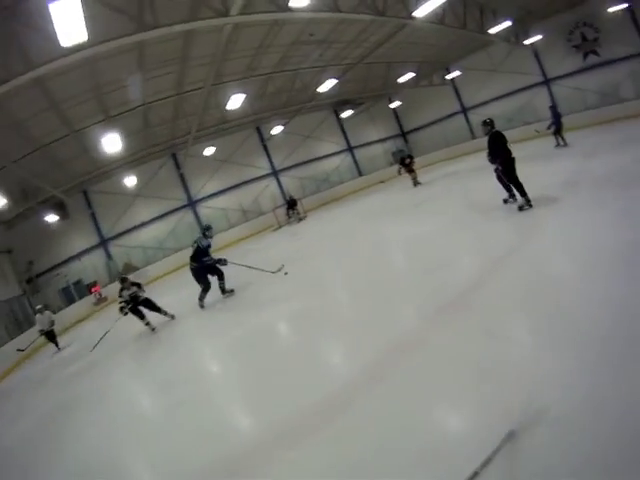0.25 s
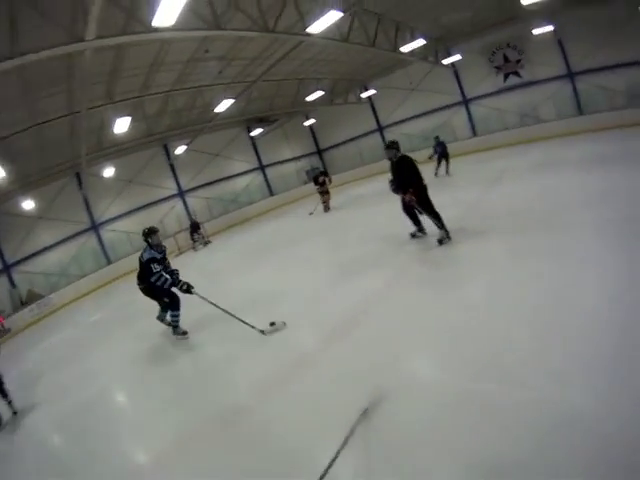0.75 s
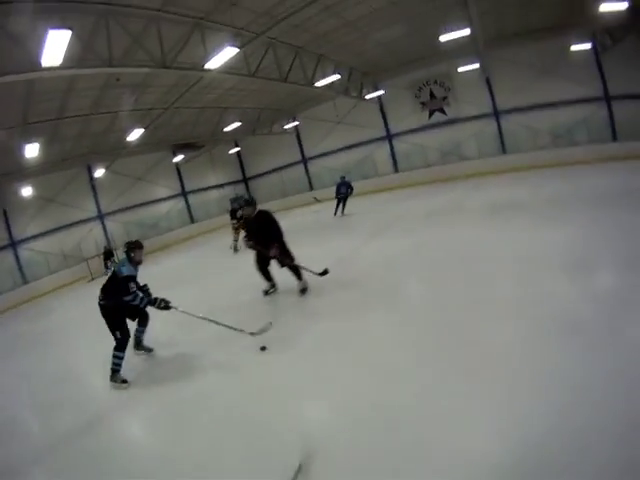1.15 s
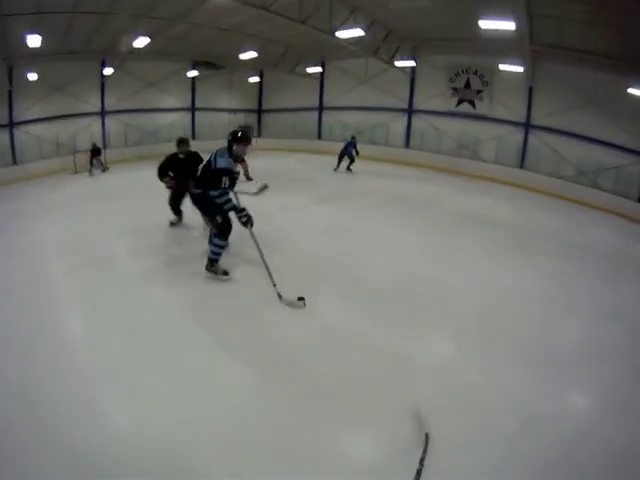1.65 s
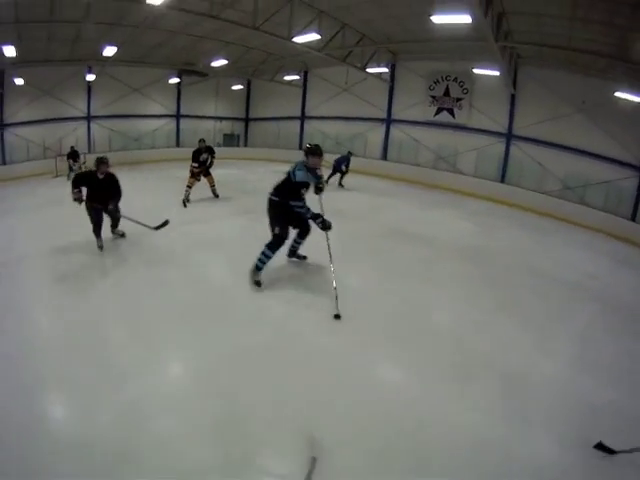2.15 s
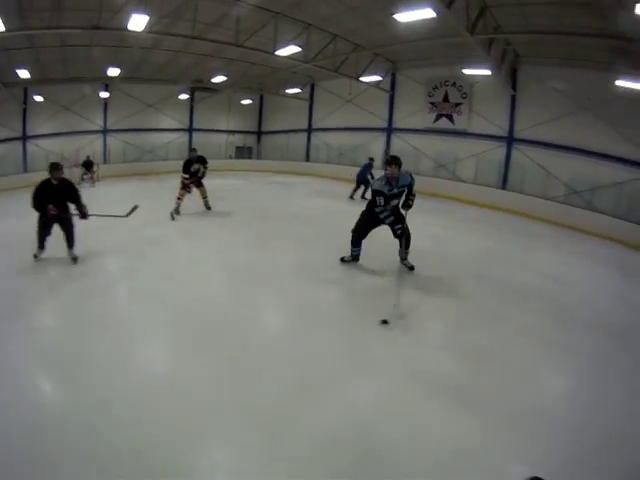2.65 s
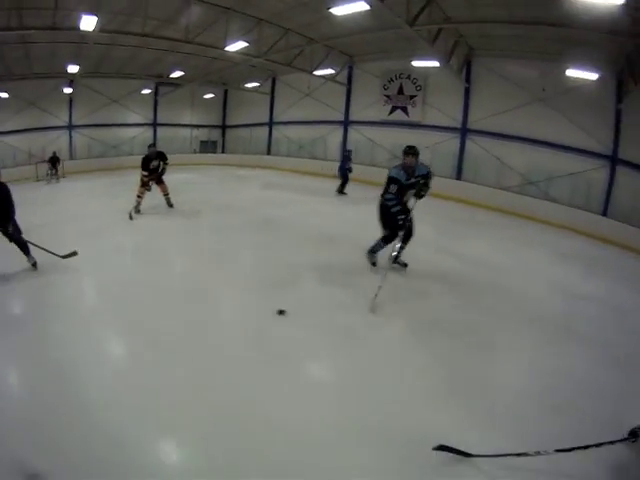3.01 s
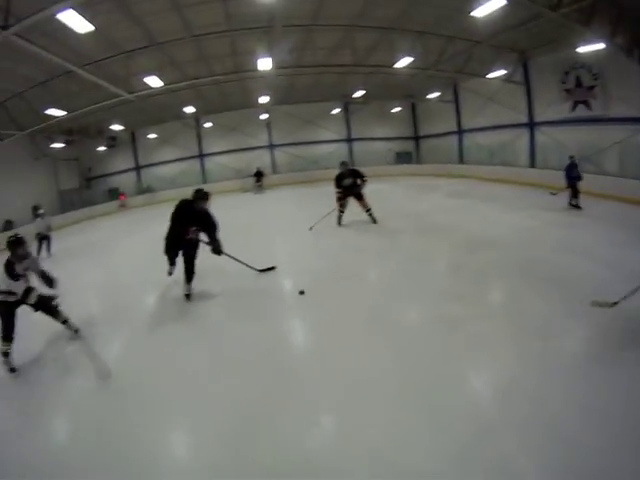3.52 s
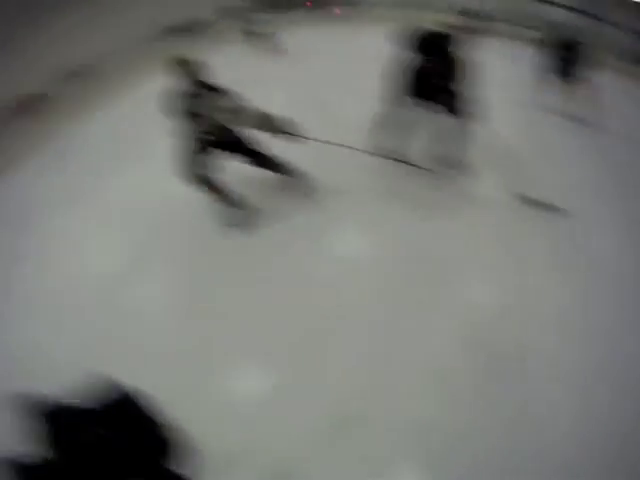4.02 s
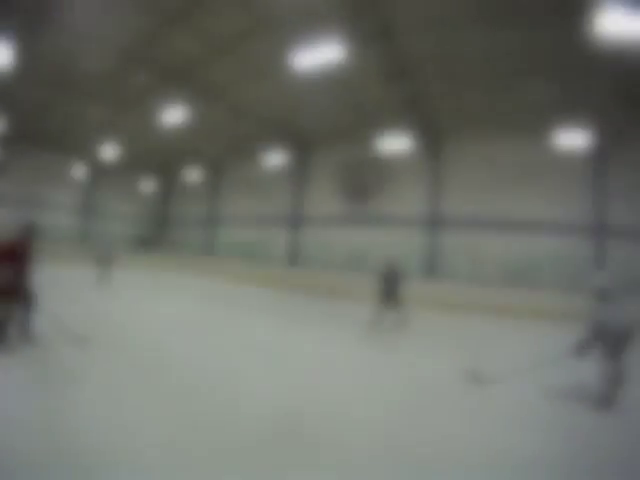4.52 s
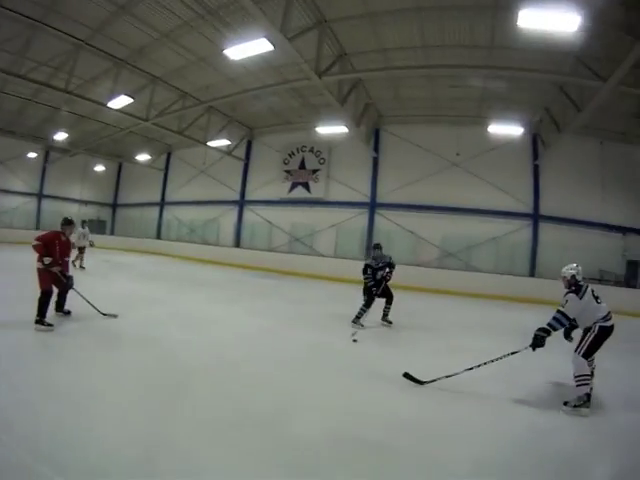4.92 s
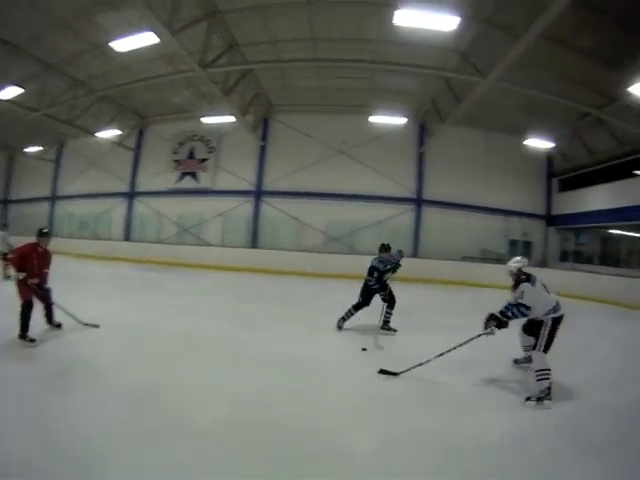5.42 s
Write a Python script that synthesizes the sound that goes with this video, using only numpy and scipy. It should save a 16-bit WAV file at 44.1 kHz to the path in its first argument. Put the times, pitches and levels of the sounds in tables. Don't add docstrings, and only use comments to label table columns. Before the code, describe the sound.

Skate blades scrape and hiss across rink ice over muffled rumble, with light stick ticks building to a hard puck clack and a grinding stop.

```python
import sys
import numpy as np
from scipy import signal
from scipy.io import wavfile
from scipy.ndimage import uniform_filter1d

SR = 44100
rng = np.random.default_rng(int(sys.argv[2]) if len(sys.argv) > 2 else 0)


def boost(x):
    u = np.asarray(x, float) / 20
    return 10 ** u


def master_out(mix):
    frames = np.transpose(np.atleast_2d(mix))
    ceiling = np.clip(frames, -1, 1)
    pcm = np.round(ceiling * 32767).astype(np.int16)
    wavfile.write(sys.argv[1], SR, pcm)


N = 249606
HALL_T60_S = 1.6

# frequency in Hz, width in Hz, level in dB.
CASE_MODES = [(406, 190, -23.5), (817, 330, -12), (1100, 245, -5), (1290, 129, -2.5), (1538, 115, -7),
              (1943, 180, -2), (2440, 324, -6), (3193, 192, -6.5), (3650, 283, -4.5), (4340, 307, -9.5),
              (4716, 516, -11), (5064, 425, -11.5), (5506, 280, -15)]
# time in seconds, level in dB.
AIR_SPEED = [(0, -38), (1.0, -36), (1.6, -41), (2.2, -40.5), (2.65, -38.5), (3.1, -43), (4.3, -46),
             (4.9, -47.5), (5.3, -48), (5.66, -44)]
# centre in seconds, peak in dB, length in seconds, flutter in relative dB.
HEAD_LURCHES = [(0.0, -24, 0.13, -21), (0.336, -20.5, 0.16, -17.5), (0.57, -33, 0.074, -17),
                (.74, -24.5, .14, -14), (1.076, -21.5, 0.15, -11.5), (1.199, -28.5, 0.2, -15),
                (1.464, -28, 0.18, -32), (1.589, -31.5, .07, -8), (1.72, -26, 0.058, -11),
                (1.854, -34, 0.085, -15), (2.07, -37, .08, -8), (2.375, -35, 0.062, -12),
                (2.623, -32, 0.19, -23), (3.36, -37, .1, -21), (3.742, -37, 0.12, -13),
                (3.878, -33, 0.14, -1.5), (3.994, -29, 0.15, -6.5), (4.19, -33.5, .12, 0.5),
                (4.84, -46, 0.066, 0), (4.944, -41, .07, 2), (5.057, -43.5, 0.037, -1),
                (5.33, -46, .07, -12), (5.453, -39, .08, -10), (5.584, -34.5, .14, -26)]
# start in seconds, peak in dB, pitch in Hz.
HELMET_KNOCKS = [
    (.266, -23, 123),
    (0.362, -18, 115),
    (1.076, -27, 129),
    (1.585, -22.5, 99),
    (1.715, -21, 73.5),
    (3.086, -25.5, 82),
    (3.688, -31, 302),
    (3.734, -27, 324),
    (4.1592, -14, 204),
]
# start in seconds, hold in seconds, level in dB.
FAR_CARVES = [
    (2.35, .15, -48.5),
    (2.82, 0.092, -50),
    (3.137, 0.45, -46),
    (4.2, 0.18, -66),
    (4.608, 0.16, -43),
]
# time in seconds, blade loudness in dB, nearness of the closest skater in dB.
PLAY_CURVE = [(0.0, -39.5, -1.5), (0.3, -38, -1), (0.7, -39, 0.5), (1.1, -37.5, 2), (1.45, -36.5, -0.5),
              (1.9, -38, -0.5), (2.3, -38.5, 0.5), (2.56, -34.5, 3.5), (2.76, -36.5, 4.5), (2.9, -34, 1.5),
              (3.15, -36, 5), (3.45, -33, 3), (3.64, -35, 0), (4.5, -41.5, 4), (4.8, -35, 3),
              (5.4, -38.5, 0), (5.47, -33.5, 1.5), (5.66, -33, 0.5)]
# time in seconds, peak in dB, knock in relative dB, crack in relative dB.
FAR_TICKS = [(0.0755, -28, -5, -4), (0.152, -27, -14, -9), (0.184, -30, -12, -8), (.379, -33, -7, -6),
             (0.61, -30, -3, -11), (0.917, -30, 2, -10), (0.997, -29, -4, -13), (1.071, -29, -3, -7),
             (1.3395, -23, -9, -11), (1.4085, -23, -5, -12), (1.7055, -21, -7, -16), (1.79, -29, -8, -15),
             (2.049, -30, -4, -15), (2.459, -28, -4, -11), (2.611, -22, -8, -13), (2.657, -26, -5, -11),
             (2.791, -26, -9, -7), (2.8525, -24, -5, -9), (2.868, -23, -11, -14), (3.009, -24, -13, -13),
             (3.186, -28, -7, -8), (3.291, -25, -9, -14), (4.114, -19, -5, -8), (4.145, -22, -5, -11),
             (5.518, -18, -9, -8), (5.55, -23, -12, -17), (5.564, -20, -13, -14), (5.573, -28, 4, -6)]
# time in seconds, peak in dB, knock and crack in relative dB, length in seconds.
PUCK_FIGHT = [(3.576, -30.5, 2.5, -17, 0.011), (3.592, -21.5, -19, -21, 0.0024),
              (3.6485, -16, -8.5, -13, 0.0067), (3.701, -19, -12, -18, 0.01),
              (3.712, -24.5, -20, -17, 0.018), (3.734, -7.5, -3, -3.5, 0.0044),
              (3.74, -19.5, -3, -7.5, 0.028), (3.774, -15, -19, -20, 0.011), (3.787, -18, -10, -10, 0.0093),
              (3.813, -28, -3, 0, 0.0033), (3.8268, -12, -13, 5, 0.003), (3.83, -10, -9.5, -8.5, 0.016),
              (3.868, -16.5, -11.5, -3, 0.026), (3.908, -11, -17, -11, 0.0024),
              (3.919, -25, -7, -0.5, 0.007)]
# frequency in Hz, level in dB, T60 in seconds.
SHOT_MODES = [(1070, -8, .022), (1570, -1, .026), (1960, -4, .016), (2370, -4, .014), (2550, -1, .016)]


def rms_one(x):
    return x / np.sqrt(np.mean(x ** 2) + 1e-20)


def in_time(rows):
    time_s, *columns = np.transpose(rows)
    return [np.interp(np.arange(N) / SR, time_s, column) for column in columns]


def band(x, low_hz, high_hz, order=2):
    return signal.sosfilt(signal.butter(order, [low_hz, high_hz], "band", fs=SR, output="sos"), x)


def drift(rate_hz):
    r = np.exp(-2 * np.pi * rate_hz / SR)
    return rms_one(signal.lfilter([1], [1, -2 * r, r * r], rng.standard_normal(N + SR))[SR:])


def swell(start_s, rise_s, hold_s, db_per_s):
    t = np.arange(N) / SR - start_s
    return np.clip(t / rise_s, 0, 1) * boost(-db_per_s * np.maximum(t - rise_s - hold_s, 0))


def steadied(x):
    return rms_one(x / (uniform_filter1d(np.abs(rms_one(x)), size=2500) + 0.93))


def case(x):
    out = 0
    for k, (hz, width_hz, db) in enumerate(CASE_MODES):
        r = np.exp(-np.pi * width_hz / SR)
        b = (1 - r * r) / 2 * np.array([1, 0, -1])
        a = [1, -2 * r * np.cos(2 * np.pi * hz / SR), r * r]
        out = out + (-1) ** k * boost(db) * signal.lfilter(b, a, x)
    return out


def registers(x):
    heard = case(x)
    return band(heard, 257, 1257), band(heard, 1750, 2807, order=3), band(heard, 2644, 7670, order=3)


def hall(x):
    t = np.arange(round(1.5 * SR)) / SR
    onset = np.clip((t - 0.02) / 0.047, 0, 1)
    tail = rng.standard_normal(len(t)) * boost(-60 * t / HALL_T60_S) * onset
    tail = band(tail, 1690, 2530)
    return signal.fftconvolve(x, tail / np.sqrt(np.sum(tail ** 2)))[:N]


def lingering(gain):
    r = boost(-120 / (HALL_T60_S * SR))
    power = signal.lfilter([1 - r], [1, -r], gain ** 2, zi=[r * gain[0] ** 2])[0]
    return np.sqrt(power)


def hiss():
    return boost(-59.5) * rms_one(band(rng.standard_normal(N), 173, 350, order=1))


def buffeting():
    air_db, = in_time(AIR_SPEED)
    rumble_power = boost(air_db) ** 2
    flutter_power = boost(-47.5 + 0.55 * (air_db + 39.5)) ** 2
    for centre_s, peak_db, length_s, flutter_db in HEAD_LURCHES:
        phase = np.clip((np.arange(N) / SR - centre_s) / length_s, -0.5, 0.5)
        lump = boost(peak_db) ** 2 * np.cos(np.pi * phase) ** 4
        rumble_power = rumble_power + lump
        flutter_power = flutter_power + boost(flutter_db) ** 2 * lump
    turn = boost(-42) * swell(start_s=3.64, rise_s=0.21, hold_s=0.5, db_per_s=36)
    flutter_power = flutter_power + turn ** 2

    rush = boost(-16.5) * rms_one(band(rng.standard_normal(N), 177, 686))
    rumble = rms_one(band(rng.standard_normal(N), 24.1, 46.3))
    flutter = band(rng.standard_normal(N), 25.3, 90.5, order=1)
    flutter = rms_one(band(flutter, 44.3, 163, order=3))
    rumble_gain = boost(1.36 * drift(3.8)) * np.sqrt(rumble_power)
    flutter_gain = boost(0.57 * drift(17)) * np.sqrt(flutter_power)
    return rumble_gain * steadied(rumble) + flutter_gain * (steadied(flutter) + rush)


def jolts():
    out = np.zeros(N)
    t = np.arange(round(0.06 * SR)) / SR
    for start_s, peak_db, hz in HELMET_KNOCKS:
        i = round(start_s * SR)
        swing = np.sin(2 * np.pi * hz * t) * boost(-9 * hz * t)
        out[i:i + len(t)] += boost(peak_db) * swing * np.minimum(t / 0.0041, 1)
    return out


def far_turns():
    gain = sum(boost(db) * swell(start_s, 0.027, hold_s, 48) for start_s, hold_s, db in FAR_CARVES)
    return lingering(gain) * rms_one(band(case(rng.standard_normal(N)), 710, 1170))


def chips(per_s, spread_db):
    sizes = boost(spread_db * np.minimum(rng.exponential(1, N), 5)) * rng.choice([-1, 1], N)
    breaks = rng.random(N) < per_s * boost(4.5 * drift(30)) / SR
    return rms_one(sizes * breaks)


def skates():
    play_db, near_db = in_time(PLAY_CURVE)
    play_swing_db = play_db + 38
    stop_s = 3.748
    grind = swell(stop_s, rise_s=0.17, hold_s=0.26, db_per_s=31.5)
    snow = boost(-34) * swell(stop_s, rise_s=0.075, hold_s=0.2, db_per_s=32)

    drone_gain = np.hypot(boost(-46 + 0.8 * play_swing_db + 0.26 * near_db), boost(-39) * grind)
    scrape_gain = np.hypot(boost(play_db), boost(-25.5) * grind)
    spray_gain = np.hypot(boost(-51 + 1.2 * play_swing_db + near_db), snow)

    wash = rng.standard_normal(N) * boost(1.2 * drift(33))
    drone, scrape, spray = registers(wash + boost(-8.5) * chips(per_s=1500, spread_db=3.5))
    drone = lingering(drone_gain) * boost(1.0 * drift(3)) * rms_one(drone)
    scrape = scrape_gain * boost(0.5 * drift(7.1)) * rms_one(scrape)
    spray = spray_gain * boost(0.75 * drift(6.6)) * rms_one(spray)
    return drone + scrape + spray


def clacks():
    out = np.zeros(N)
    t = np.arange(round(0.06 * SR)) / SR
    tick_length_s = 0.007
    contacts = PUCK_FIGHT + [(*tick, tick_length_s) for tick in FAR_TICKS]
    for time_s, peak_db, knock_db, crack_db, length_s in contacts:
        rattle = rng.standard_normal(len(t))
        chatter = np.sign(rattle) * np.abs(rattle) ** 0.5 * np.exp(-(1.31 * t / length_s) ** 3)
        knock, body, crack = [part / np.abs(part).max() for part in registers(chatter)]
        hit = boost(peak_db + 1.27) * (boost(knock_db - 0.5) * knock + body + boost(crack_db - 0.3) * crack)
        edge = band(crack, 4440, 5600)
        hit = hit + boost(peak_db - 9 + 1.8 * crack_db) * edge / np.abs(edge).max()
        i = round((time_s - 0.0006) * SR)
        out[i:i + len(t)] += hit[:N - i]
    return out


def shot():
    t = np.maximum(np.arange(N) / SR - 3.7342, 0)
    rings = np.zeros(N)
    for k, (hz, db, t60_s) in enumerate(SHOT_MODES):
        rings += (-1) ** k * boost(-5.5 + db - 60 * t / t60_s) * np.sin(2 * np.pi * hz * t)
    return rings * np.minimum(t / 0.0015, 1)


def scene():
    hits = clacks() + shot()
    noise = hiss() + buffeting() + jolts()
    mix = noise + far_turns() + skates() + hits + boost(-16.5) * hall(hits)
    return mix[None]


def band_limit(x):
    return signal.sosfilt(signal.butter(12, 16470, fs=SR, output="sos"), x)


def record(dry):
    sample_hz, hold, cutoff_hz = 12000, 4, 15240
    slow = signal.resample(dry, round(N * sample_hz / SR), axis=1)
    held = signal.resample(np.repeat(slow, hold, axis=1), N, axis=1)
    low_pass = signal.ellip(8, 0.3, 47, cutoff_hz, fs=SR, output="sos")
    return band_limit(signal.sosfilt(low_pass, held))


dry = scene()
out = record(dry)
master_out(out)
```